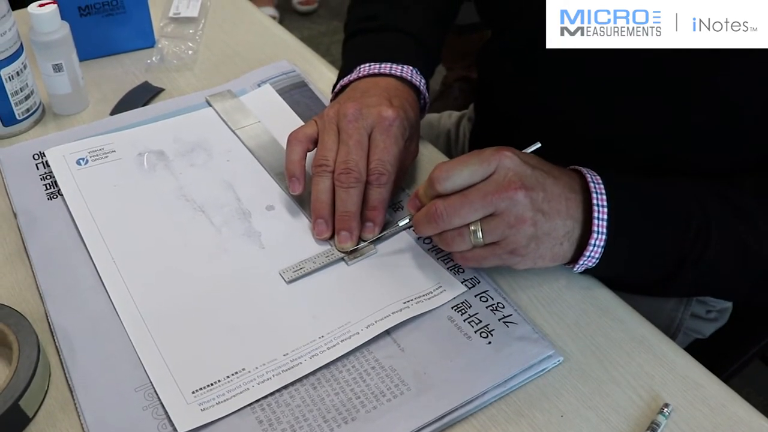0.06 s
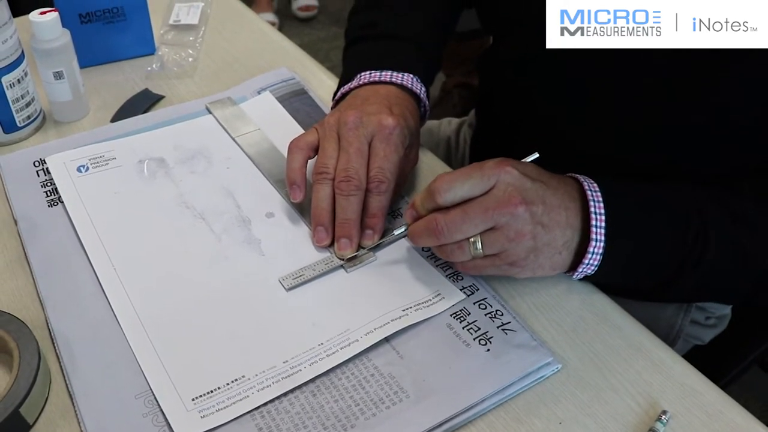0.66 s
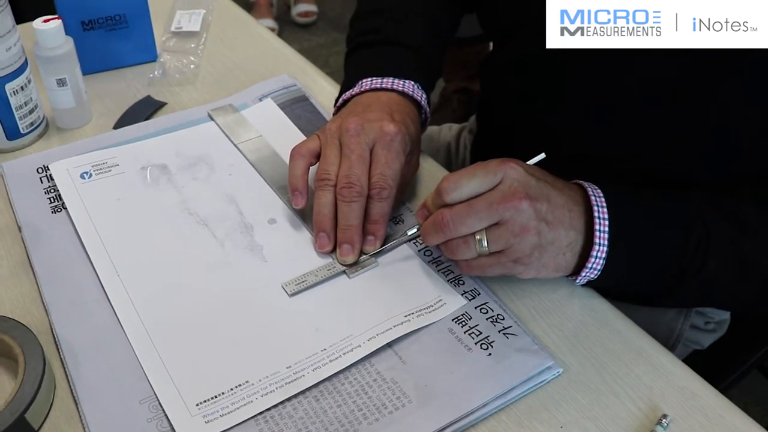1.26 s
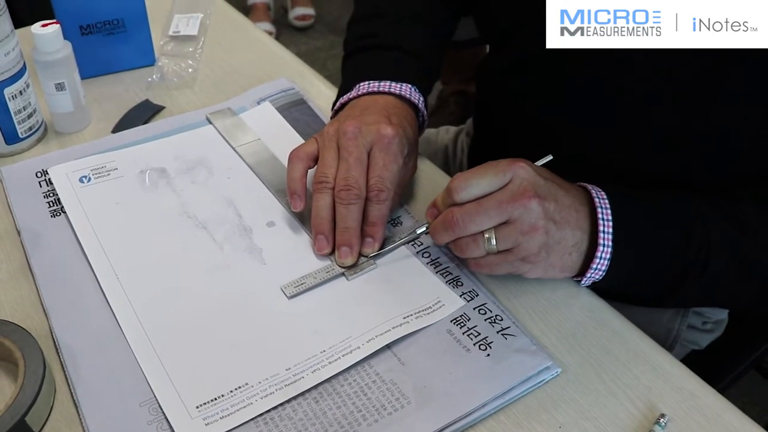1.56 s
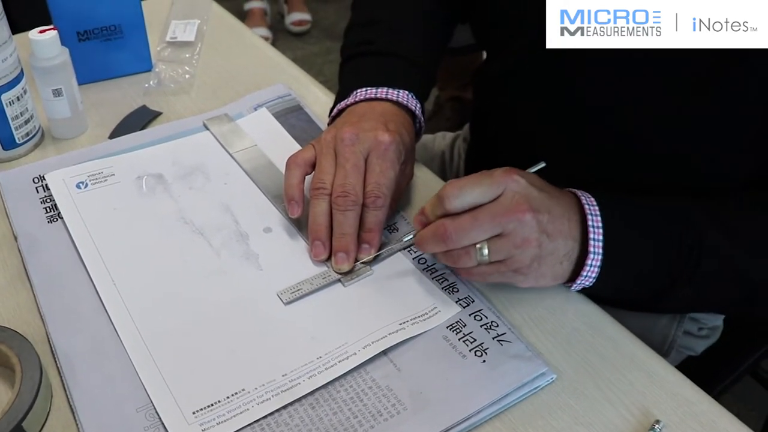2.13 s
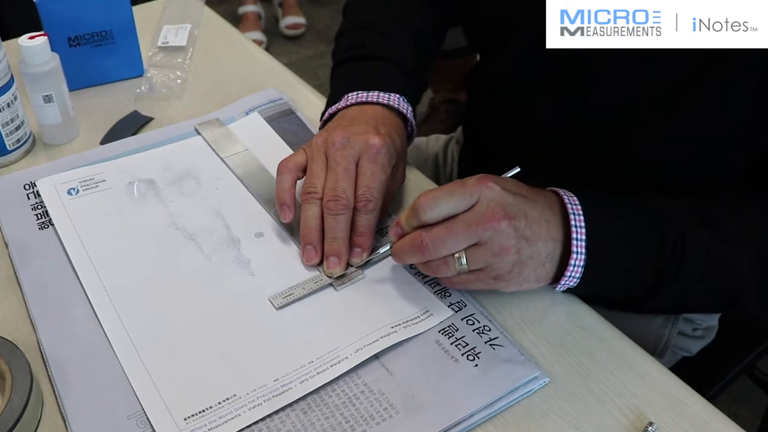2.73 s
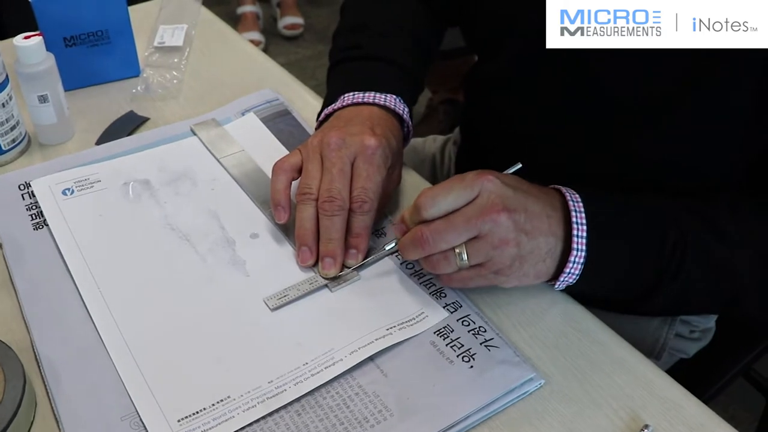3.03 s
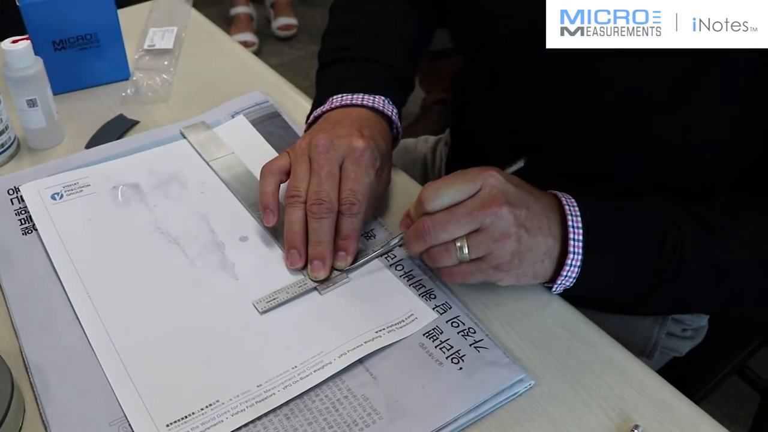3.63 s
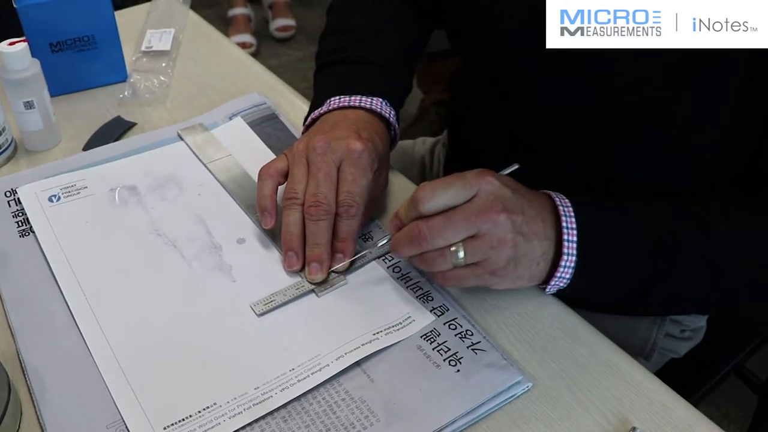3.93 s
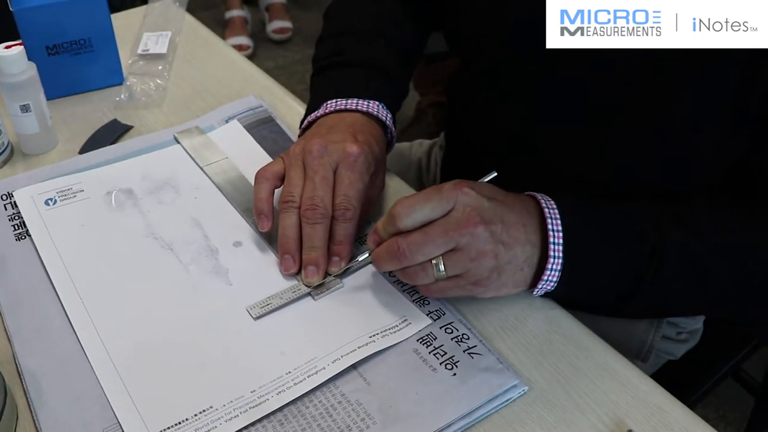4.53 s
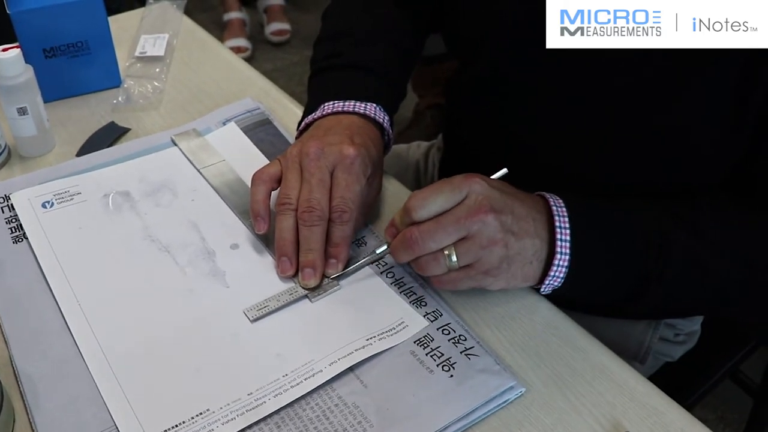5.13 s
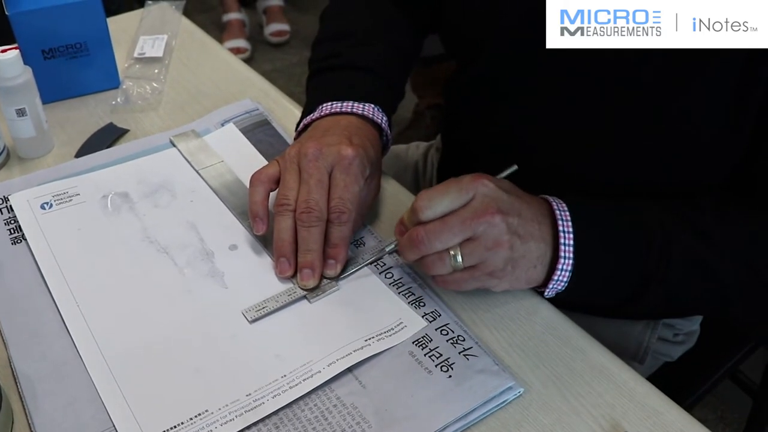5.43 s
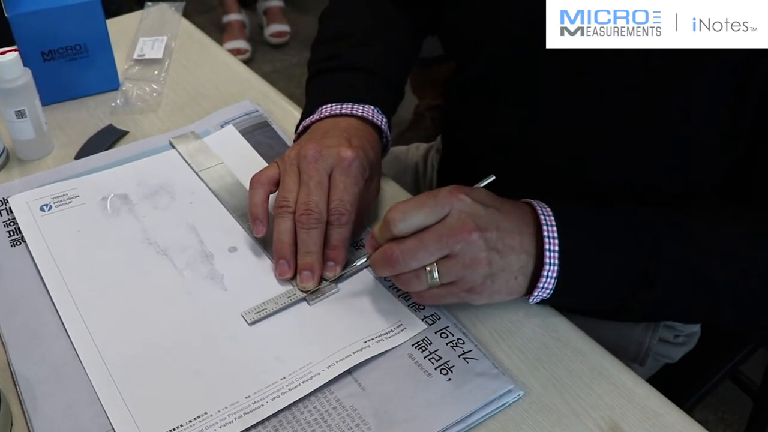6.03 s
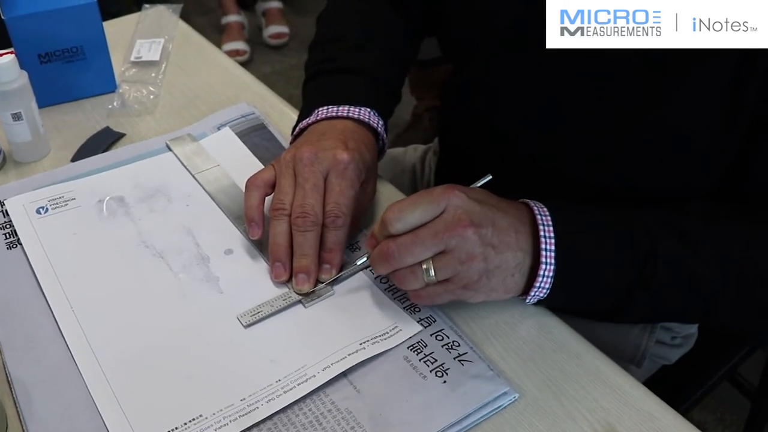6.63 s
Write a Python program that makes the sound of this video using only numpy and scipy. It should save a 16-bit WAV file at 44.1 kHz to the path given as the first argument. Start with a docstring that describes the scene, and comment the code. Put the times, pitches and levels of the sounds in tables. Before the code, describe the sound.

A metal pick scrapes along a steel ruler in short bouts of sharp, ringing clicks over soft ventilation in a small room.

```python
"""A steel pick is drawn hard along a steel ruler that a hand presses onto a metal beam on a desk.
The point sticks and slips, and every jump makes the steel ring. Each stroke starts with a light
scratch, breaks into sharp clicks and ends in a quick skid. The pick squeaks as it runs off the edge,
and light taps follow. The small lab answers with a short echo, and its ventilation rumbles softly."""
import sys
import numpy as np
from scipy import signal
from scipy.fft import rfft, irfft
from scipy.io import wavfile

SR = 44100
rng = np.random.default_rng(int(sys.argv[2]) if len(sys.argv) > 2 else 0)


def digitize_waveform(pressure):
    """Quantize a signal to 16-bit integers and store it at the path in sys.argv[1].

    Rows of a 2-D input are taken as channels; values are limited to [-1, 1].
    """
    field = np.atleast_2d(pressure).T
    bounded = np.clip(field, -1, 1)
    quanta = np.round(bounded * 32767).astype(np.int16)
    wavfile.write(sys.argv[1], SR, quanta)


N = 299439


def from_db(db):
    """Turn decibels into a number to multiply by."""
    return 10 ** (np.asarray(db) / 20)


def rms_one(x):
    """Scale a signal to an average (rms) strength of 1."""
    return x / np.sqrt(np.mean(x ** 2) + 1e-20)


def at_hz(table, hz, column=1):
    """Read a table's column at any pitch, gliding between the rows."""
    table = np.array(table)
    return np.interp(np.log(np.maximum(hz, 1)), np.log(table[:, 0]), table[:, column])


def coloured(x, colour):
    """Make each pitch in a sound louder or softer, as a table says."""
    return irfft(rfft(x) * from_db(at_hz(colour, np.fft.rfftfreq(len(x), 1 / SR))), len(x))


def seconds(length):
    """The time of each sample in a sound of this length."""
    return np.arange(int(length * SR)) / SR


def spikes(times, gains):
    """A one-sample push at each given time."""
    return np.bincount(np.round(np.asarray(times) * SR).astype(int), gains, N)[:N]


def convolve(x, response):
    """Let every sample of x set off its own copy of the response."""
    return signal.oaconvolve(x, response)[:N]


def add(out, start_s, sound):
    """Mix a short sound in at a given time."""
    at = int(round(start_s * SR))
    out[at:at + len(sound)] += sound[:N - at]


def ring(hz, fade_s, rise_s, phase=0):
    """One tone of struck metal: it swells as the bend spreads, then falls 60 dB in its fade time."""
    t = seconds(fade_s + 0.0101)
    swell = 1 - np.exp(-t / rise_s)
    return np.sin(2 * np.pi * hz * t + phase) * swell * np.exp(-np.log(1000) * t / fade_s)


# The rumble and hiss of moving air. Each row: pitch in Hz, relative level in dB.
AIR_COLOUR = [(12, -31), (20, -5.5), (37, -7), (68, -7), (204, -4), (228, -4.5), (285, -5), (399, -11),
              (472, -8.5), (642, -14.5), (976, -15), (1530, -20), (2820, -28.5), (14700, -35), (16000, -40)]
# The hum of the ducts and a faint fan whine. Each row: pitch in Hz, width in Hz, level in dB.
DUCT_HUMS = [(72.8, 7.2, -63.5), (127.5, 3.3, -63), (239.2, 10, -54.5), (284, 11, -57), (476, 29, -82.5),
             (970, 22, -67)]


def ventilation(rush_db):
    """Air rushes steadily, and the ducts and fan add a few narrow hums."""
    rush = from_db(rush_db) * rms_one(coloured(rng.standard_normal(N), AIR_COLOUR))
    hz = np.fft.rfftfreq(N, 1 / SR)
    peaks = sum(from_db(level_db) * rms_one(1 / (1 + ((hz - centre) / width) ** 2))
                for centre, width, level_db in DUCT_HUMS)
    return rush + irfft(rfft(rng.standard_normal(N)) * peaks, N)


# The scratch that opens a stroke and swells until the point bites.
# Each row: start in seconds, time of the bite in seconds, relative level at the bite in dB.
STROKES = [(0.832, 0.96, -32), (2.897, 3.011, -30), (4.782, 4.922, -32.5), (6.571, 6.617, -33.5)]
# The point loses its hold and chatters on. Each row: start and end in seconds, force in dB, first gap
# in seconds, share of a gap that the next one keeps, extra treble in dB, friction in dB.
SKIDS = [(0.1475, 0.169, -9.5, 0.0075, 0.47, 0, -22), (1.7807, 1.823, -8, 0.0095, .89, 0.5, -26),
         (3.7109, 3.73, -8, .0063, .55, -0.5, -22), (5.4255, 5.449, -8, 0.0061, .8, 2.5, -22)]


def friction(peak_grains_per_s, swell_db_per_s=97, release_db_per_s=900, spread_db=4):
    """The point catches on tiny bumps: many in a fast skid, only a few in a slow, light slide."""
    t, force = np.arange(N) / SR, np.zeros(N)
    for start, bite, level_db in STROKES:
        on = (t > start) & (t < bite)
        force[on] += from_db(level_db - swell_db_per_s * (bite - t[on]))
    for start, end, *_, level_db in SKIDS:
        on = t > start
        # the rubbing dies away as the hand stops
        force[on] += from_db(level_db - release_db_per_s * np.clip(t[on] - end, 0, .2))
    speed = (force / force.max()) ** 0.73
    grains = (rng.random(N) < speed * peak_grains_per_s / SR) * rng.choice([-1, 1], N)
    return force / np.sqrt(speed + 1e-9) * grains * from_db(spread_db * rng.standard_normal(N))


# The tones of pick, ruler and beam, damped by the fingers.
# Each row: pitch in Hz, relative level in dB, fade time in seconds.
STEEL_TONES = [ (175, -39, 0.066), (398, -43, .22), (428, -29.5, .05), (545, -38, .05), (675, -25.5, .034),
               (830, -26, .036), (1000, -27.5, .07), (1090, -19.5, .022), (1386, -21, 0.018),
               (1560, -24.5, 0.024), (1840, -11, 0.0092), (2082, -16.5, 0.0099), (2343, -11.5, 0.0062),
               (2713, -28.5, 0.028), (3003, -25.5, 0.014), (3950, -22, 0.011), (4830, -15.5, .0145),
               (5470, -17.5, .015), (6145, -17, 0.0045), (7280, -17, 0.012), (7600, -22.5, 0.011),
               (8210, -20, 0.012), (9000, -21, 0.011), (9470, -24.5, 0.011), (10620, -9.5, .0117),
               (11520, -20.5, .0103), (11820, -15.5, .0063), (12790, -8.5, .0106), (13520, -20, .015),
               (14300, -20, 0.0068), (14940, -10, 0.0046)]
# How those tones change over a whole stroke.
# Each row: pitch in Hz, change as a share of that pitch, change of level in dB.
TRAVEL_EFFECT = [(3000, 0.0069, -2), (3950, -0.026, -9), (4920, -0.041, -3.5), (5490, -0.039, -6),
                 (5820, 0.019, -2), (6980, 0.069, 1), (7600, 0.001, -17), (7960, 0.0054, 5),
                 (8760, 0.07, -13), (10470, 0, -5.5), (11820, -0.033, -7.5), (12740, 0.0021, -2),
                 (13400, -0.0031, -5), (14000, -.03, -7), (14900, .05, -3)]


def steel_tone(k, travel, rise_s, detune=0, lag_s=0):
    """Tone k of the steel, which depends on how far the point has travelled (0 to 1)."""
    hz, level_db, fade_s = STEEL_TONES[k]
    shift = at_hz(TRAVEL_EFFECT, hz) * (travel - .5)
    change_db = at_hz(TRAVEL_EFFECT, hz, column=2) * (travel - .5)
    tone = ring(hz * (1 + shift + detune), fade_s, rise_s, phase=2 * np.pi * hz * lag_s)
    return (-1) ** k * from_db(level_db + change_db) * tone  # neighbouring tones swing opposite ways


# The colour of the rubbing force. Each row: pitch in Hz, boost or cut in dB.
FRICTION_COLOUR = [(300, 0.5), (2000, -1.5), (4800, -4.5), (8000, -1.5), (10600, -12.5), (12700, -16),
                   (15000, -6)]


def scratches(gain_db, travel):
    """Friction sets the steel ringing before each bite and during each skid."""
    force = from_db(gain_db) * coloured(friction(peak_grains_per_s=1400), FRICTION_COLOUR)
    steel = np.zeros(N)
    for k in range(len(STEEL_TONES)):
        add(steel, 0, steel_tone(k, travel, rise_s=0.000143))
    return convolve(force, steel[:SR // 4])


# Sharp stick-slip clicks, each slightly delayed, with a little random timing.
# Each row: time in seconds before that delay is added, force in dB.
SLIPS = [(0.209, -25), (0.878, -27), (0.893, -24), (0.919, -26.5), (0.934, -19), (0.939, -20),
         (0.943, -16.5), (0.957, -13.5), (0.982, -12.5), (1.026, -12), (1.107, -11), (1.192, -9.5),
         (1.333, -7.5), (1.407, -9), (1.447, -9), (1.461, -11.5), (1.479, -14.5), (1.497, -14.5),
         (1.51, -14), (1.523, -15), (1.538, -15.5), (1.556, -14.5), (1.587, -12), (3.003, -21),
         (3.015, -14), (3.062, -10.5), (3.172, -9.5), (3.257, -8), (3.27, -11), (3.302, -12),
         (3.349, -10.5), (3.38, -12), (3.426, -10), (3.438, -13.5), (3.469, -13.5), (3.48, -15.5),
         (3.493, -15.5), (3.513, -17), (3.527, -14.5), (3.56, -15), (4.797, -33.5), (4.832, -30),
         (4.913, -25.5), (4.926, -18.5), (4.946, -12), (5.107, -10), (5.112, -16.5), (5.12, -12),
         (5.132, -17), (5.164, -14), (5.174, -14.5), (5.18, -16), (5.189, -19.5), (5.195, -19.5),
         (5.201, -15.5), (5.21, -17), (5.236, -12.5), (6.614, -18.5), (6.622, -15), (6.66, -11),
         (6.693, -10), (6.718, -10.5), (6.743, -10.5)]


def point_jumps(delay_s=.0012, timing_scatter_s=.0004, shortest_gap_s=.003):
    """List all jumps of the slips and skids as: time in seconds, force in dB, extra treble in dB."""
    delays = delay_s + timing_scatter_s * rng.uniform(-1, 1, len(SLIPS))
    jumps = [(start + delay, force_db, 0) for (start, force_db), delay in zip(SLIPS, delays)]
    for at_s, end, force_db, first_gap, gap_share, treble_db, _ in SKIDS:
        jumps.append((at_s, force_db, treble_db))
        gap = first_gap
        while at_s + gap < end:
            at_s += gap
            loss_db = 5.5 + 6.5 * np.log2(first_gap / gap)  # a shorter hold stores less force
            jumps.append((at_s, force_db - loss_db, treble_db))
            gap = max(gap * gap_share, shortest_gap_s)
    return np.array(sorted(jumps))


# The borders in Hz between five pitch bands: the body, the treble, two bright rings and the top.
BAND_BORDERS_HZ = [3300, 10000, 11200, 13800]
# How those bands answer a jump. Each row: boost in dB at the start of the edge, boost in dB at its end,
# dB lost for each dB of force below a full bite.
BRIGHTNESS = [(0, -.5, 0), (0, 4.5, 0.2), (0.5, 4.5, 0.5), (-1.5, 8.5, 1.1), (-1, 0, 0)]


def clicks(jumps, gain_db, rise_s, scatter_db, whole_stroke_db=13, full_bite_db=-17.5):
    """Each jump strikes the steel: brighter further along the edge, duller under a light touch."""
    out, travel = np.zeros(N), np.zeros(len(STROKES) + 1)
    chance = rng.standard_normal((len(jumps), 3, len(STEEL_TONES)))
    bands = np.searchsorted(BAND_BORDERS_HZ, np.array(STEEL_TONES)[:, 0])
    start_db, end_db, softening = np.array(BRIGHTNESS)[bands].T
    for (at_s, force_db, treble_db), (luck, grip, lag) in zip(jumps, chance):
        stroke = np.searchsorted(np.array(STROKES)[:, 0], at_s)
        travel[stroke] += from_db(force_db - whole_stroke_db)  # a harder jump goes further
        colour_db = start_db + (end_db - start_db) * min(travel[stroke], 1)
        colour_db += treble_db * (bands > 1)  # only above 10 kHz
        colour_db -= softening * max(full_bite_db - force_db, 0)
        for k, gain in enumerate(from_db(gain_db + force_db + colour_db + scatter_db * luck)):
            # the point never grips twice alike, so each tone is a little out of tune and out of step
            tone = steel_tone(k, travel[stroke], rise_s, detune=.004 * grip[k], lag_s=.000012 * lag[k])
            add(out, at_s, gain * tone)
    return out


# The tones of the beam and the ruler's free end.
# Each row: pitch in Hz, relative level in dB, fade time in seconds.
FREE_END_TONES = [(375, 0, 0.44), (424.6, -0.5, .35), (1172, -2.5, 0.45), (1746, -5, .4), (2820, -9, .35),
                  (3920, -7.5, .4), (4870, -1.5, 0.25), (5400, -2, 0.33), (7400, -7, 0.13)]


def after_ring(jumps, gain_db):
    """The steel beyond the fingers is hardly damped, so it rings on quietly after each jump."""
    free_end = np.zeros(N)
    for hz, level_db, fade_s in FREE_END_TONES:
        add(free_end, 0, from_db(level_db) * ring(hz, fade_s, rise_s=.003))
    return convolve(spikes(jumps[:, 0], from_db(jumps[:, 1] + gain_db)), free_end[:SR])


# The colour of a snap. Each row: pitch in Hz, boost or cut in dB.
SNAP_COLOUR = [(150, 4), (400, 16.5), (1000, 5.5), (2200, -7.5), (3200, 7.5), (6400, 3.5), (9500, 6.5),
               (13000, 14.5), (16000, -4)]


def snaps(jumps, gain_db):
    """Each jump throws a snap in all directions, heard only when the room sends it back."""
    return coloured(spikes(jumps[:, 0], from_db(jumps[:, 1] + gain_db)), SNAP_COLOUR)


# The lab's lingering echo. Each row: pitch in Hz, relative level in dB, fade time in seconds.
ROOM_TAIL = [(154.4, -12.5, 0.45), (416, -7.5, 0.57), (1024, -8, 0.7), (2000, -12.5, 0.5),
             (5160, -16, 0.53), (9050, -15.5, 0.31), (13000, -17, 0.11), (16400, -17, 0.2)]
# Bounces off the desk, arms and body. Each row: delay in seconds, relative level in dB.
NEAR_ECHOES = [(.0068, -20), (.0118, -18), (0.0155, -31.5), (.0245, -47)]


def lab_echo(sound, tail_db, gap_s, dull_above_hz, smear_s=0.0005):
    """The room returns a few dull, close bounces, then a wash of echo whose treble dies first."""
    t = seconds(.7)
    edges_hz = np.geomspace(100, 18000, 14)
    tail = np.zeros(len(t))
    for low, high in zip(edges_hz, edges_hz[1:]):
        hz = np.sqrt(low * high)
        decay = np.log(1000) / at_hz(ROOM_TAIL, hz, column=2)
        band = signal.butter(2, [low, high], "band", fs=SR, output="sos")
        noise = signal.sosfilt(band, rng.standard_normal(len(t)))
        gain = from_db(at_hz(ROOM_TAIL, hz) + tail_db) * np.sqrt(2 * decay / SR)
        tail += gain * noise * np.exp(-decay * t)
    tail *= np.clip(t / gap_s - 1, 0, 1)  # silent for the gap, then fades in
    delays, echo_db = np.transpose(NEAR_ECHOES)
    dull = signal.butter(1, dull_above_hz, fs=SR, output="sos")
    bounces = signal.sosfilt(dull, spikes(delays, from_db(echo_db))[:len(t)])
    # uneven surfaces smear each bounce
    smear = rng.standard_normal(len(t)) * np.exp(-t / smear_s)
    bounces = convolve(bounces, smear / np.linalg.norm(smear))[:len(t)]
    return convolve(sound, tail + bounces)


# Light taps after the strokes, and a faint brush at 4.6 seconds, before the next stroke.
# Each row: start in seconds, relative level in dB.
TAPS = [(.1851, -29), (2.0024, -25), (2.0065, -10.5), (3.7446, -14), (3.852, -16), (4.6, -32.5),
        (4.6182, -31.5), (5.5627, -13.5)]
# The colour of a tap. Each row: pitch in Hz, boost or cut in dB.
TAP_COLOUR = [(200, -17), (600, -8), (1100, -1), (2500, -3), (3800, -6), (5200, 0.5), (7800, -4),
              (10000, -13), (16000, -18)]


def taps(gain_db, rattle_db, fade_s):
    """With no weight on it, the pick gives a dry tick and a tiny rattle."""
    times, level_db = np.transpose(TAPS)
    t = seconds(.03)
    tick = from_db(rattle_db) * rng.standard_normal(len(t)) * np.exp(-np.log(1000) * t / fade_s)
    tick[0] += 1  # the hit itself
    return coloured(convolve(spikes(times, from_db(level_db + gain_db)), tick), TAP_COLOUR)


# The point runs over the edge and drops off it.
# Each row: start in seconds, squeak strength in dB, wait for the drop in seconds, knock strength in dB.
RUN_OFFS = [(1.8196, -16, 0.004, -5), (3.7302, 0, 0.0043, -9.5), (5.4510, -4.5, 0.00365, -22)]
# The tones of the squeak and the knock. Each row: pitch in Hz, relative level in dB, fade time in seconds.
SQUEAK_TONES = [(5200, -24.5, 0.0186), (7270, -25, 0.012), (12600, -16, 0.012)]
KNOCK_TONES = [(1710, -12.5, 0.0082), (2660, -7, 0.0061)]


def run_offs(rise_s):
    """On the edge the contact changes and the pick squeaks, then drops with a dull knock."""
    out = np.zeros(N)
    for start_s, squeak_db, wait_s, knock_db in RUN_OFFS:
        for hz, level_db, fade_s in SQUEAK_TONES:
            add(out, start_s, from_db(squeak_db + level_db) * ring(hz, fade_s, rise_s))
        for hz, level_db, fade_s in KNOCK_TONES:
            add(out, start_s + wait_s, from_db(knock_db + level_db) * ring(hz, fade_s, rise_s))
    return out


def scene():
    """Mix the pick on the ruler, the room's echo and the ventilation into one channel."""
    air = ventilation(rush_db=-48)
    jumps = point_jumps()
    pick = scratches(gain_db=-1, travel=0.18)
    pick += taps(gain_db=8, rattle_db=-14.5, fade_s=0.017)
    pick += clicks(jumps, gain_db=10, rise_s=0.0005, scatter_db=2.14)
    pick += after_ring(jumps, gain_db=-39)
    pick += run_offs(rise_s=0.00049)
    echo = lab_echo(pick + snaps(jumps, gain_db=14), tail_db=-5.5, gap_s=0.0076, dull_above_hz=2900)
    return (pick + echo + air)[None]


def record(dry):
    """The microphone drops the deepest bass; the loudest peaks are rounded and the top treble is cut."""
    bass_hz, treble_hz, ceiling = 28, 16300, 1.2
    picked_up = signal.sosfilt(signal.butter(2, bass_hz, "high", fs=SR, output="sos"), dry)
    rounded = ceiling * np.tanh(picked_up / ceiling)
    return signal.sosfilt(signal.ellip(10, .1, 80, treble_hz, fs=SR, output="sos"), rounded)


dry = scene()
out = record(dry)
digitize_waveform(out)
```